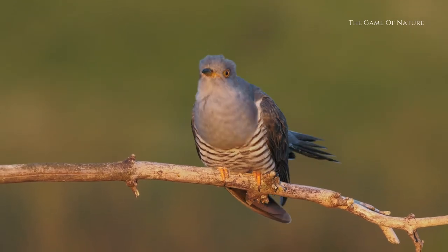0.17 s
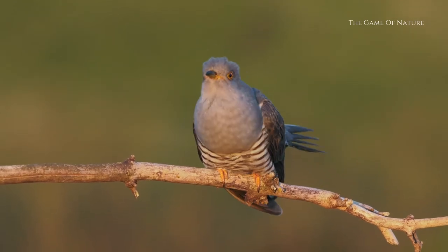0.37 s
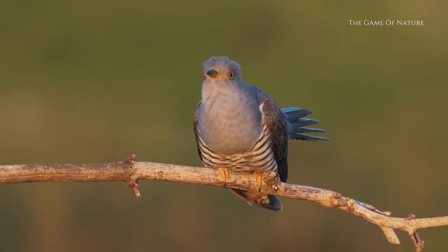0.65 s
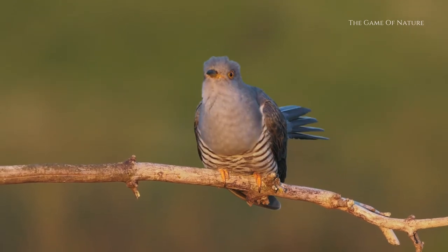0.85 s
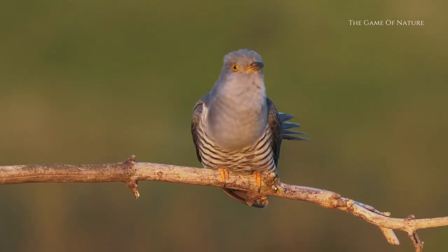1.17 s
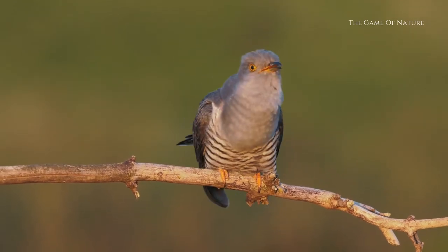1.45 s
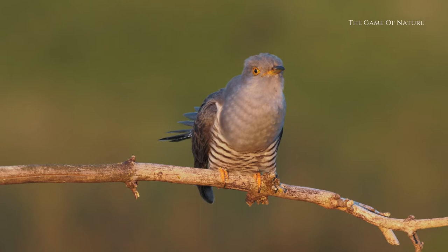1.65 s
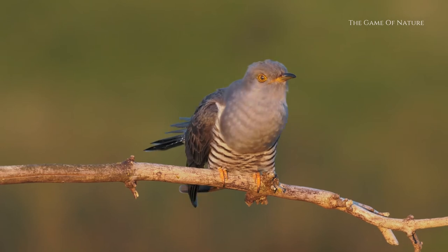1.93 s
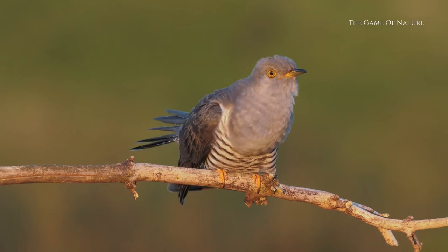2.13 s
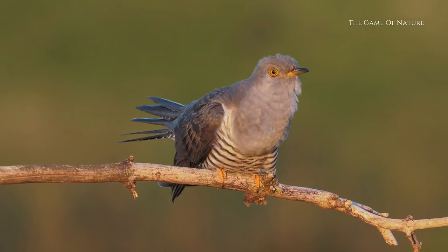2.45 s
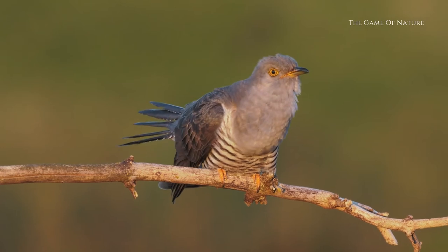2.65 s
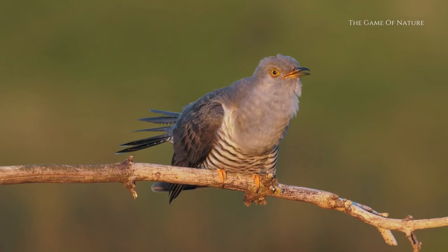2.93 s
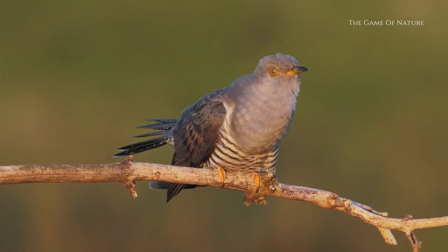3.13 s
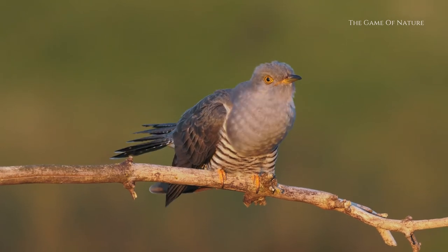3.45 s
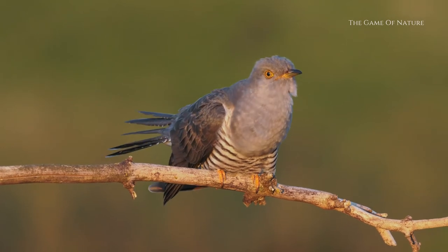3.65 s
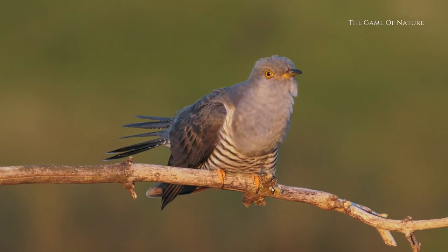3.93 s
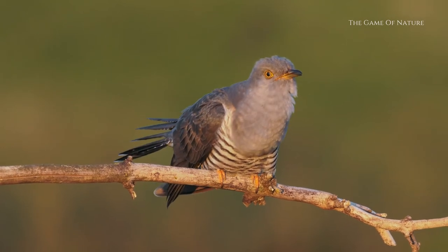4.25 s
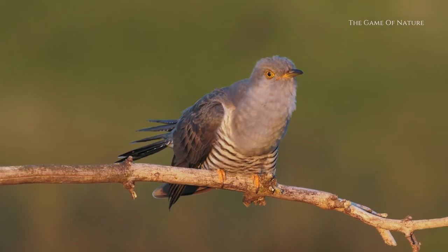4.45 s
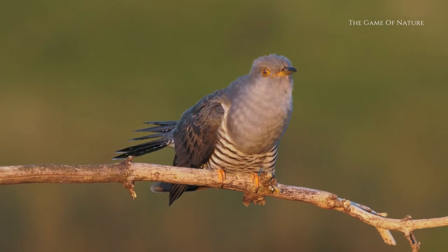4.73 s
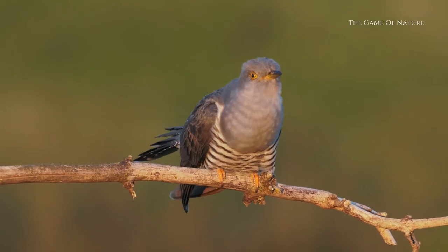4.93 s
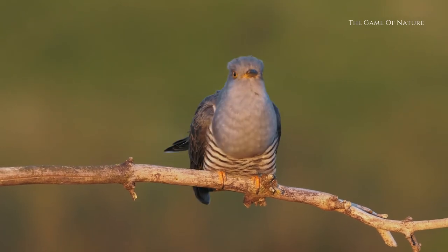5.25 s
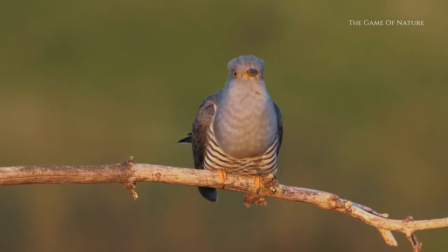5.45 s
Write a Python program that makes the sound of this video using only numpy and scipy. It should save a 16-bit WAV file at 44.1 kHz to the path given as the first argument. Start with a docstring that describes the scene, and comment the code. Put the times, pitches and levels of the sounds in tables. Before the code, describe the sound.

Close to the microphone, a cuckoo calls four times, about one and a half seconds apart: a short, higher note, then a longer, lower, nearly level one. The tone is hollow and almost pure, slightly hoarse. Trees return a faint short echo. Far songbirds are barely heard at first, then warble more busily between the third and fourth calls. A soft low rumble and distant engine drone continue throughout.

```python
"""Open country with trees: a cuckoo close by calls "cuc-koo" four times, and the trees return a short echo.
Its voice is a nearly pure tone with weak overtones, roughened by flutter, hoarseness and breath noise.
Far off, songbirds warble in whistles built from gliding sines. Behind them are a distant engine's drone,
made of a few wavering sines, and a low open-air rumble and a faint hiss, both made of filtered noise."""
import sys
import numpy as np
from scipy import signal
from scipy.fft import rfft, irfft
from scipy.io import wavfile
from scipy.ndimage import uniform_filter1d

SR = 44100
rng = np.random.default_rng(int(sys.argv[2]) if len(sys.argv) > 2 else 0)


def transcribe(signal):
    """Save signal, clipped to [-1, 1], as a 16-bit WAV file at the path in sys.argv[1]."""
    frames = np.atleast_2d(signal).T
    limited = np.clip(frames, -1, 1)
    pcm = np.round(limited * 32767).astype(np.int16)
    wavfile.write(sys.argv[1], SR, pcm)


N = 246519

# The course of one "cuc" and one "koo", sung with a closed beak.
# Each row: place in the note (0 start, 1 end), pitch in Hz before the note's own factor,
# level of the fundamental (the lowest tone) in dB before the note's own level.
CUC_SHAPE = [(-.12, 258.5, -42.5), (-.01, 432.1, -35), (0.101, 534.5, -21), (.27, 630.6, -9),
             (.43, 649.4, -9.5), (.56, 651.2, -9.5), (.66, 626.3, -11.5), (.78, 584.7, -12),
             (.95, 549.4, -20.5), (1.029, 510, -51)]
KOO_SHAPE = [(-.055, 276.6, -48.5), (0, 469.5, -27.5), (0.044, 511.5, -16), (0.098, 520.5, -12.5),
             (0.171, 531.2, -9), (.65, 525.8, -10), (.9, 530.5, -12.5), (0.959, 511.2, -19.5),
             (1.02, 494.6, -49.5)]
# The notes sung. Each row: start in seconds, length in seconds, pitch factor at the start, pitch factor
# at the end, level in dB, flutter depth in radians, windpipe resonance in Hz, its boost in dB,
# added hoarseness in dB, level change over the note in dB. A "cuc" row goes on with: place in the note
# where the voice cracks (0 to 1), strength of the crack in dB.
CUC_NOTES = [(-.056, 0.09524, 0.9777, 0.9834, -.1, 0.033, 4630, 7.9, -0.5, 0, 0.35, 8.2),
             (1.632, 0.09493, 0.9955, 0.9837, -.1, 0.11, 4365, 6.5, 0.5, -0.9, 0.515, 9.5),
             (3.0991, 0.09577, 1, 0.9956, 0.11, 0.04, 4480, 9.1, -2.45, -0.5, 0.44, 10),
             (4.7113, 0.0943, 1, 1, .1, 0.0315, 4430, 10.54, -2, 0.9, 0.418, 6.9)]
KOO_NOTES = [(0.2196, 0.18408, 0.998, 0.9648, -0.42, 0.0412, 5140, 12.3, -2.5, 1.5),
             (1.9096, 0.1714, 1.0025, 0.9852, -0.052, 0.0593, 4836, 4.4, -4, -0.67),
             (3.3794, 0.1641, 1.001, 0.9908, -0.23, 0.11, 4850, 5.81, 3.02, -0.56),
             (4.9919, 0.1644, 1, 0.9889, -.1, 0.17, 4842, 6, -3.5, .1)]
# What throat and beak let through of the overtones. Each row: frequency in Hz, level in dB.
CUC_THROAT = [(600, -19.5), (850, -33.5), (1200, -42), (1900, -52), (2600, -57.5), (3300, -57.5),
              (3900, -54), (4500, -60.5), (5200, -69.5), (5900, -75.5), (7000, -78.5), (7800, -63.5),
              (8500, -71.5), (9500, -81.5), (11000, -91), (12300, -73), (13500, -86.5)]
KOO_THROAT = [(600, -16.5), (1050, -43), (1580, -56), (2100, -53.5), (2630, -50.5), (3150, -61.5),
              (3680, -56.5), (4200, -66.5), (4730, -67), (5260, -75), (5800, -69.5), (6300, -76.5),
              (6850, -79), (7400, -75.5), (7900, -82), (9000, -99)]
# Distant songbirds, one glide a row; a whistle that leaps in pitch takes several rows.
# Each row: start in seconds, turn of the glide in seconds after that, length in seconds,
# pitch in Hz at the start, at the turn and at the end, level in dB at the start and at the end,
# warble depth in Hz.
GLIDES = [(.46, 0.046, 0.108, 3380, 3684, 3745, -76.5, -77.5, 79),
          (.97, 0.066, 0.11, 3550, 3714, 3950, -80, -76.5, 82),
          (2.62, 0.041, 0.084, 3600, 3770, 3940, -80, -79, 81.5),
          (3.199, .012, 0.0273, 2003, 2380, 1784, -62.5, -57.5, 0.5),
          (3.658, .014, 0.0193, 1295, 1710, 1800, -63, -58.5, -3.5),
          (3.682, 0.0155, 0.025, 2269, 1772, 1676, -65, -53, 0),
          (3.745, 0.0272, 0.06, 1811, 2267, 2314, -70.5, -70.5, 100),
          (3.77, 0.046, 0.11, 3634, 3680, 3780, -74, -78.5, 147.5),
          (3.786, .024, 0.077, 1909, 2182, 2280, -61.5, -59, 79.5),
          (3.852, 0.0592, 0.0677, 2253, 2613, 2150, -64, -58.5, -2.5),
          (3.856, 0.0097, 0.0496, 1307, 1618, 1793, -58.5, -56, -2),
          (3.901, .011, 0.0276, 2508, 1756, 1830, -55, -54, -0.5),
          (3.924, 0.0174, .042, 2142, 1923, 1634, -53, -60.5, 186),
          (3.97, 0.0103, 0.024, 2574, 2213, 1810, -65, -70, -1),
          (4.055, 0.0228, 0.105, 1932, 2185, 2100, -67, -65, 174.5),
          (4.093, 0.0453, 0.0683, 2850, 2605, 1942, -70.5, -55, 9),
          (4.16, .035, 0.1083, 1924, 1780, 1802, -59, -59.5, 5.5),
          (4.16, 0.0146, 0.032, 3200, 3154, 3070, -71.5, -78, 0.5),
          (4.17, 0.052, 0.113, 2300, 2263, 2287, -74, -72, 102),
          (4.28, 0.0406, 0.073, 1585, 1595, 1648, -68, -71, -1),
          (4.275, 0.0654, 0.119, 1840, 2147, 2324, -63.5, -65.5, 112.5),
          (4.35, 0.0304, 0.0557, 1766, 1900, 2097, -69.5, -61.5, 102),
          (4.406, .045, 0.0736, 2284, 2315, 2187, -67.5, -65, 99),
          (4.465, 0.124, 0.11, 1278, 1434, 1353, -62.5, -56.5, 3),
          (4.54, 0.0986, 0.265, 2199, 2037, 1950, -67.5, -58.5, -3.5),
          (4.64, .008, .016, 1440, 1453, 1510, -57.5, -57.5, -2.5),
          (4.657, 0.0099, 0.022, 1800, 2350, 1926, -53.5, -51, -3),
          (4.672, 0.0094, .02, 1900, 1730, 1760, -46.5, -56.5, -2.5),
          (4.85, .06, .11, 3700, 4000, 4050, -82.5, -73.5, 80),
          (4.91, .04, 0.0752, 1798, 1836, 1956, -75, -65.5, -0.5),
          (5.26, 0.02, 0.0665, 3094, 3360, 3476, -72, -73, 0.5),
          (5.31, .025, 0.049, 2256, 2423, 2480, -75, -73.5, -0.5),
          (5.4, 0.0266, 0.098, 1497, 1982, 2026, -67, -62, 4.5),
          (5.51, .04, 0.074, 2238, 2240, 2386, -72.5, -72.5, 60.5)]
# Tones of the far engine. Each row: average frequency in Hz, average level in dB.
ENGINE_TONES = [(150.7, -61), (226.1, -62), (301.5, -68), (376.8, -66), (473.7, -78.5)]
# Tone color of the open-air rumble. Each row: frequency in Hz, relative level in dB per Hz.
AIR_SPECTRUM = [(8.8, -40.5), (15, -8), (49, 0), (102, -6), (141, -7), (188, -6.5), (230, -3.5),
                (326, -9.5), (520, -3), (715, -16), (1010, -17.5), (1170, -23), (2160, -29), (9220, -35.5),
                (15600, -40.5)]

# Effort: overtones and hoarseness depend on how far the fundamental is below full effort
FULL_DB = -9  # fundamental at full effort
OVER_DB, OVER_IN, OVER_OUT = -0.9033, 0.487, 0.24  # overtones at full effort; dB lost per dB below, first half, second
DULL_HZ = 20000  # with less effort the high overtones fade faster
CUC_HOARSE_DB, KOO_HOARSE_DB = -33, -42.5  # at full effort, before the note's own hoarseness
MOST_HOARSE_DB = -12.5  # upper limit, before the note's own hoarseness
HOARSE_IN, HOARSE_OUT = 1.1, 0.23  # dB gained per dB below full effort, first half of the note, second half
RASP_DB, BREATH_DB = 11, -16.5  # how strongly hoarseness shakes the overtones and hisses
# Crack: width and fade as shares of the note; share of its dB that lifts the overtones below this pitch
CRACK_WIDTH, CRACK_OVER, CRACK_TOP_HZ = 0.079, 0.79, 3040
# Flutter: the throat sac lets only a share of it into the fundamental; end and fade are shares of the note
FLUTTER_HZ, SAC_SHARE, FLUTTER_ENDS, FLUTTER_FADE = 113.76, .27, .82, .16
# Windpipe: its resonance climbs through a note by this share, and gets louder as it climbs
CUC_RISE, KOO_RISE, PIPE_WIDTH_HZ = .09, .01, 130
PIPE_SWELL_DB = 100  # for a climb by its whole pitch
PIPE_RING_DB, PIPE_RING_HZ = 3.5, 90  # it rings on briefly: gain and width
# Late in a note the middle overtones sink for a while
DIP_HZ, DIP_WIDTH_HZ, DIP_PLACE, CUC_DIP_DB, KOO_DIP_DB = 1867.6, 450, .85, -4.5, -17.5
# Echoes: level against the direct sound, and the time to die away by 60 dB
ECHO_DB, ECHO_T60_S, FAR_ECHO_DB, FAR_ECHO_T60_S = -33.5, .55, -6, 0.21
# Songbirds: warble speed, fade-in and fade-out of a glide
WARBLE_HZ, GLIDE_IN_S, GLIDE_OUT_S = 66.02, .007, .007
# Background and channels
AIR_DB, AIR_SIDE_DB, AIR_SIDE_HZ = -54, -16, 150  # the low rumble differs a little between the channels
HISS_DB, HISS_FROM_HZ, TOP_HZ = -90, 9000, 15800
RIGHT_DB = 0.1959  # right channel above left


def cuckoo():
    """Four calls, each a short rising and falling note and then a longer, nearly level one."""
    out = np.zeros(N)
    cuc_voice = CUC_THROAT, CUC_RISE, CUC_DIP_DB, CUC_HOARSE_DB
    koo_voice = KOO_THROAT, KOO_RISE, KOO_DIP_DB, KOO_HOARSE_DB
    for notes, shape, voice in ((CUC_NOTES, CUC_SHAPE, cuc_voice), (KOO_NOTES, KOO_SHAPE, koo_voice)):
        for start, length, *rest in notes:
            sound = note(shape, *voice, length, *rest)
            # the shape begins at or a little before place 0
            add(out, sound, int((start + shape[0][0] * length) * SR))
    return out


def note(shape, throat, rise, dip_db, steady_db, length, first, last, db, flutter,
         pipe_hz, pipe_db, hoarse_db, fade_db, crack_place=0, crack_db=0):
    """The syrinx swings almost as a sine inside the puffed throat; weak overtones leak through the windpipe."""
    place, shape_hz, main_db = np.transpose(shape)
    size = int((place[-1] - place[0]) * length * SR)
    at = place[0] + np.arange(size) / SR / length
    hz = uniform_filter1d(np.interp(at, place, shape_hz), size=90)
    effort = uniform_filter1d(np.interp(at, place, undb(main_db)), size=90)

    # below full effort the overtones weaken and the voice turns hoarse, most of all in the first half
    slack_db = np.maximum(FULL_DB - 20 * np.log10(effort), 0)
    crack_db = crack_db * np.exp(-((at - crack_place) / CRACK_WIDTH) ** 2)
    over_db = OVER_DB - np.where(at < .5, OVER_IN, OVER_OUT) * slack_db
    rough_db = steady_db + np.where(at < .5, HOARSE_IN, HOARSE_OUT) * slack_db + crack_db
    rough = undb(np.minimum(rough_db, MOST_HOARSE_DB) + hoarse_db)

    hz = hz * (first + (last - first) * at + 0.00098 * walk(44, size))
    phase = 2 * np.pi * (np.cumsum(hz) / SR + rng.random())
    # the membranes flutter mid-note, which splits the overtones into side lines
    flutter_hz = FLUTTER_HZ * (1 + 0.033 * walk(30, size))
    beat = 2 * np.pi * (np.cumsum(flutter_hz) / SR + rng.random())
    flutter_fade = np.clip(np.minimum(at / 0.09, (FLUTTER_ENDS - at) / FLUTTER_FADE), 0, 1)
    shake = flutter * np.sin(beat) * flutter_fade

    # hoarseness: no two cycles are quite the same size
    main_gain = effort * undb(fade_db * (at - .5) + 0.48 * walk(60, size))
    main_gain = main_gain * (1 + rough * jitter(340, size))
    main = main_gain * np.sin(phase + SAC_SHARE * shake)

    pipe = pipe_hz * (1 + rise * (at - .5))
    pipe_gain_db = pipe_db + PIPE_SWELL_DB * rise * (at - .5)
    # the dip comes on slowly and ends fast
    dip_width = np.where(at < DIP_PLACE, .3, .05)
    dip = dip_db * np.exp(-((at - DIP_PLACE) / dip_width) ** 2)
    over = 0
    for k in range(2, 24):
        over_hz = k * hz
        through_db = np.interp(over_hz, *np.transpose(throat))
        through_db = through_db + pipe_gain_db / (1 + ((over_hz - pipe) / PIPE_WIDTH_HZ) ** 2)
        through_db = through_db + CRACK_OVER * crack_db / (1 + (over_hz / CRACK_TOP_HZ) ** 4)
        through_db = through_db + dip * np.exp(-((over_hz - DIP_HZ) / DIP_WIDTH_HZ) ** 2)
        dull_db = over_db * over_hz / DULL_HZ
        rasp = 1 + np.minimum(undb(RASP_DB) * rough, 1) * jitter(330, size)
        gain = undb(through_db + dull_db + 2.2 * walk(31, size)) * rasp
        over = over + gain * np.sin(k * (phase + shake) + k * k)

    # air hisses past once a cycle
    breath = level(ring(jitter(4200, size), 1700, 1900), BREATH_DB)
    breath = breath * rough * effort * (1 + np.sin(phase))

    edge = np.clip(np.minimum(at - place[0], place[-1] - at) * length / 0.0053, 0, 1)
    # 20 ms of silence at the end leave room for the windpipe to ring on
    upper = np.pad(edge * (over * undb(over_db) + breath), (0, SR // 50))
    upper = upper + undb(PIPE_RING_DB) * ring(upper, pipe[-1], PIPE_RING_HZ)
    return np.sqrt(2) * undb(db) * (np.pad(edge * main, (0, SR // 50)) + upper)


def trees(x, db, t60):
    """Scattered reflections from trunks and ground, added as a tail of noise that dies away."""
    t = np.arange(SR // 2) / SR
    tail = rng.standard_normal(len(t)) * np.exp(-np.log(1000) * t / t60)
    tail = undb(db) * tail / np.sqrt(np.sum(tail ** 2))
    return x + signal.fftconvolve(x, tail)[:N]


def songbird():
    """Gliding sines, some with a fast uneven warble; the air on the long path makes them flicker."""
    out = np.zeros(N)
    for start, turn, length, *glide_hz, first_db, last_db, warble_hz in GLIDES:
        t = np.arange(0, length, 1 / SR)
        size = len(t)
        hz = np.interp(t, [0, turn, length], glide_hz)
        hz = uniform_filter1d(hz, size=200, mode="nearest")
        swing = np.sin(2 * np.pi * (WARBLE_HZ * t + rng.random()) + 2.0 * walk(60, size))
        hz = hz + warble_hz * (swing + 0.33 * walk(260, size))
        # the highest voice is a scratchier bird further off
        hz = hz + (hz > 3300) * 1.8 * warble_hz * walk(400, size)
        # a deep warble also breaks the glide into beads
        flicker_db = (0.89 + warble_hz / 60) * walk(100, size)
        gain = undb(first_db + (last_db - first_db) * t / length + flicker_db)
        edge = np.clip(np.minimum(t / GLIDE_IN_S, (length - t) / GLIDE_OUT_S), 0, 1)
        glide = np.sqrt(2) * edge * gain * np.sin(2 * np.pi * np.cumsum(hz) / SR)
        add(out, glide, int(start * SR))
    return out


def drone():
    """Tones of one far engine: they waver together in pitch, and each swells a little on its own."""
    turn = 2 * np.pi * np.cumsum(1 + .004 * walk(4.6)) / SR
    out = np.zeros(N)
    for hz, db in ENGINE_TONES:
        gain = np.sqrt(2) * undb(db + 1.2 * walk(7.9))
        out += gain * np.sin(hz * turn + 2 * np.pi * rng.random())
    return out


def air():
    """Steady rumble of the open country: noise shaped by frequency, swelling a little."""
    hz, db = np.transpose(AIR_SPECTRUM)
    bins = np.maximum(np.arange(N // 2 + 1) * SR / N, 1)
    shape = undb(np.interp(np.log(bins), np.log(hz), db))
    noise = irfft(rfft(rng.standard_normal(N)) * shape, N)
    return level(noise, AIR_DB) * undb(0.38 * walk(1.7))


def undb(db):
    """Turn decibels into gain."""
    return 10 ** (np.asarray(db) / 20)


def level(x, db):
    """Scale a sound to an average (rms) level in dB."""
    return x * undb(db) / np.sqrt(np.mean(x ** 2))


def walk(rate, size=N):
    """Random drift: levels held for 1 / rate seconds and smoothed twice, with a spread near 1."""
    k = int(SR / rate)
    steps = np.repeat(rng.standard_normal(size // k + 1), k)
    return 1.463 * uniform_filter1d(uniform_filter1d(steps, k), k)[:size]


def jitter(top_hz, size):
    """Fast random shaking: noise mostly below top_hz, with a spread of 1."""
    low_pass = signal.butter(4, top_hz, fs=SR, output="sos")
    return level(signal.sosfilt(low_pass, rng.standard_normal(size)), 0)


def ring(x, hz, width_hz):
    """Resonance that favors one pitch, with gain 1 at its center."""
    return signal.lfilter(*signal.iirpeak(hz, hz / width_hz, fs=SR), x)


def add(out, x, start):
    """Mix x in from a sample number on, cut at both ends of the scene."""
    skip = max(-start, 0)
    x = x[skip:N - start]
    out[start + skip:start + skip + len(x)] += x


def scene():
    """Nearly all of it is in the middle; the right channel is a shade louder."""
    near = trees(cuckoo(), ECHO_DB, ECHO_T60_S)
    far = trees(songbird(), FAR_ECHO_DB, FAR_ECHO_T60_S)
    mono = near + far + drone() + air()
    side = undb(AIR_SIDE_DB) * signal.lfilter(*signal.butter(1, AIR_SIDE_HZ, fs=SR), air())
    balance = undb(np.array([[-RIGHT_DB], [RIGHT_DB]]) / 2)
    return mono * balance + side * np.array([[1], [-1]])


def record(dry):
    """Each channel adds its own faint treble hiss; the top is cut."""
    high_pass = signal.butter(2, HISS_FROM_HZ, "high", fs=SR, output="sos")
    hiss = signal.sosfilt(high_pass, rng.standard_normal(dry.shape))
    top_cut = signal.ellip(10, .2, 80, TOP_HZ, fs=SR, output="sos")
    return signal.sosfilt(top_cut, dry + level(hiss, HISS_DB))


dry = scene()
out = record(dry)
transcribe(out)
```